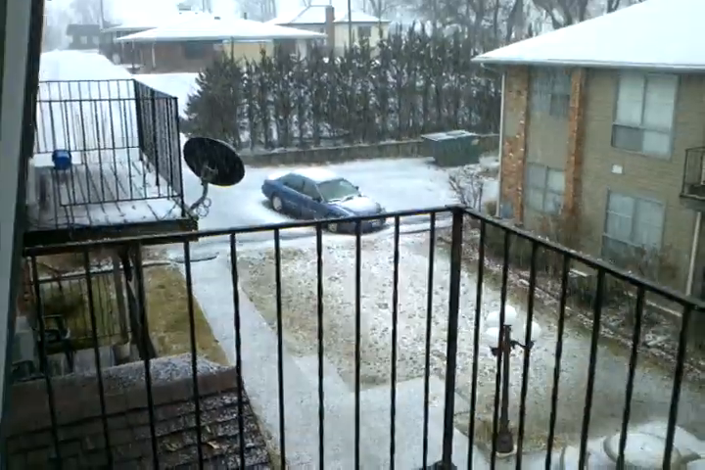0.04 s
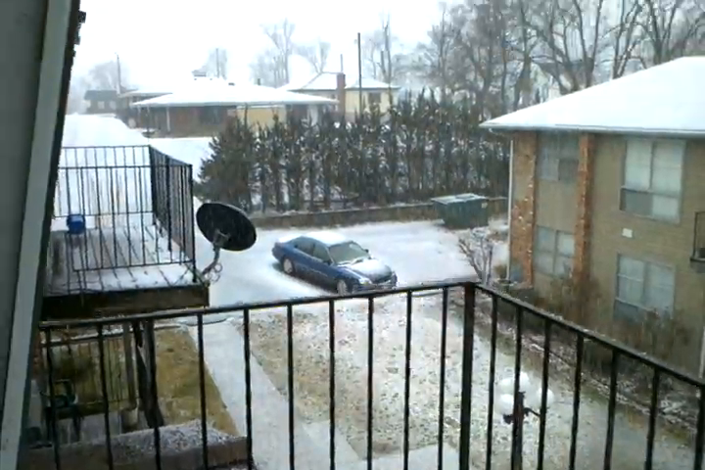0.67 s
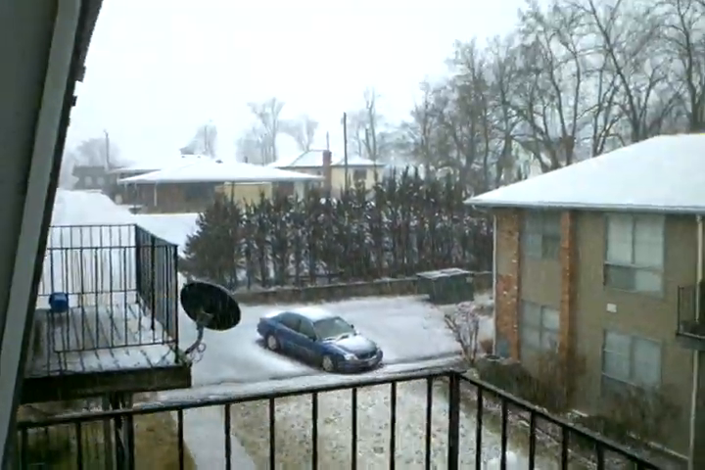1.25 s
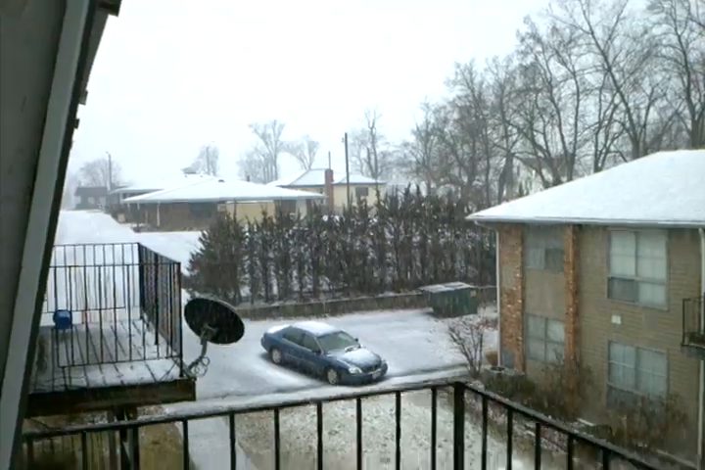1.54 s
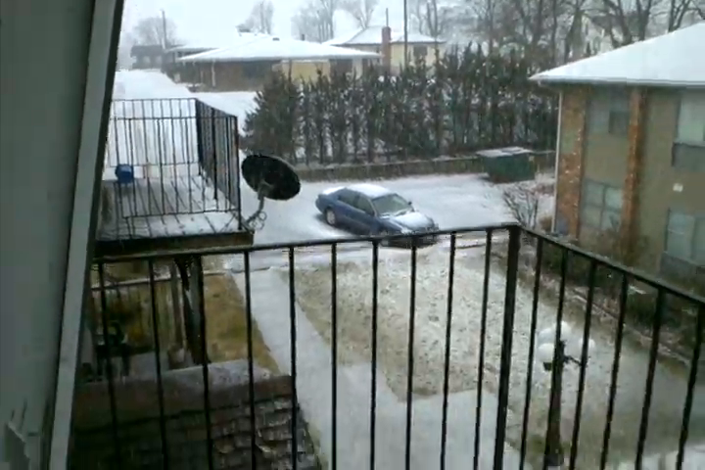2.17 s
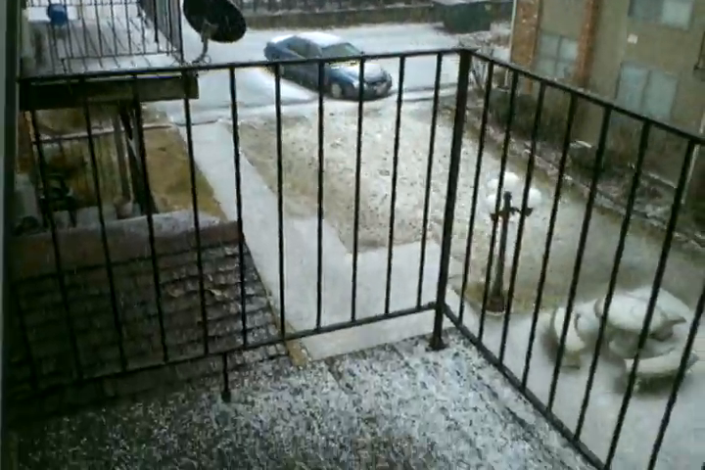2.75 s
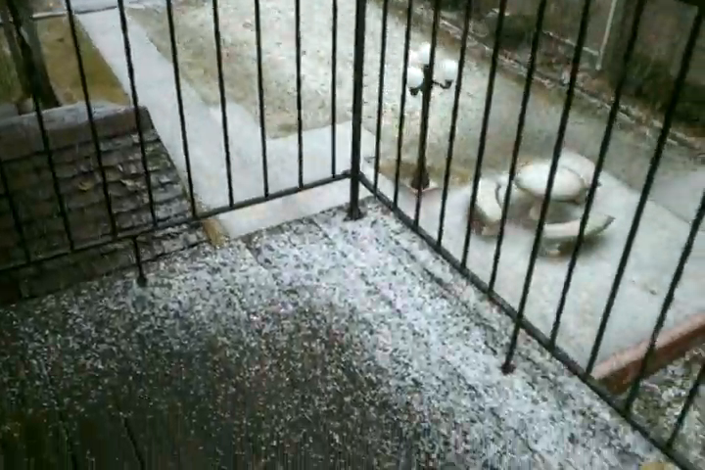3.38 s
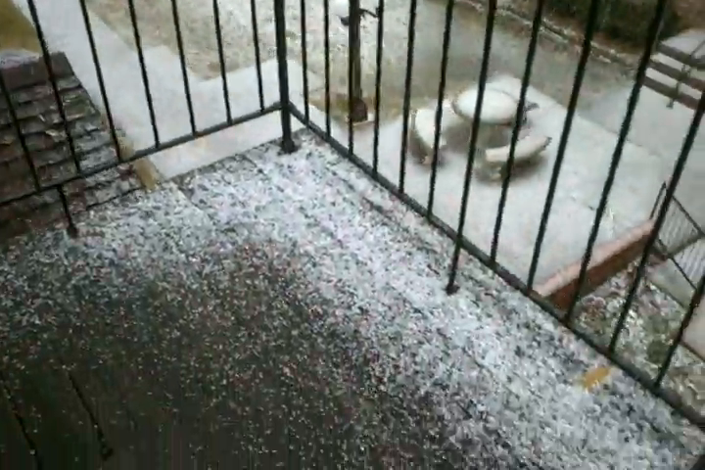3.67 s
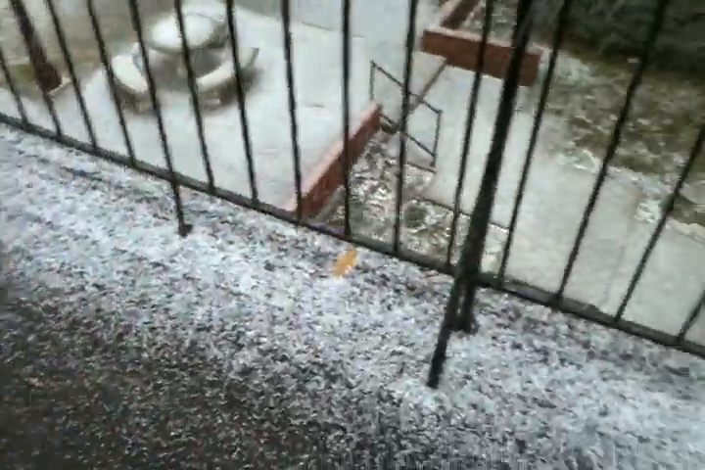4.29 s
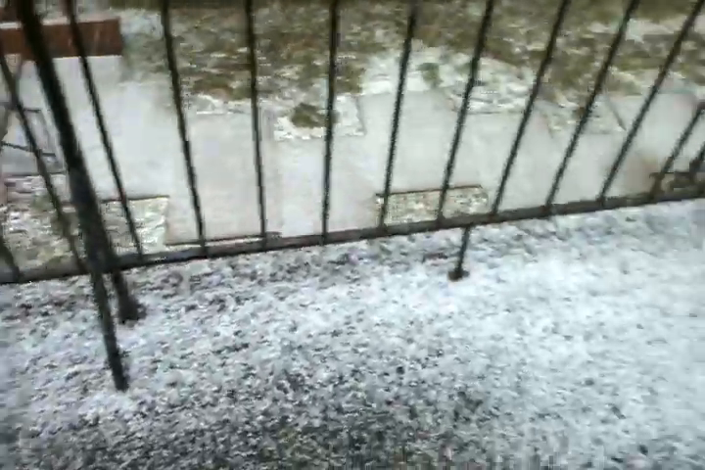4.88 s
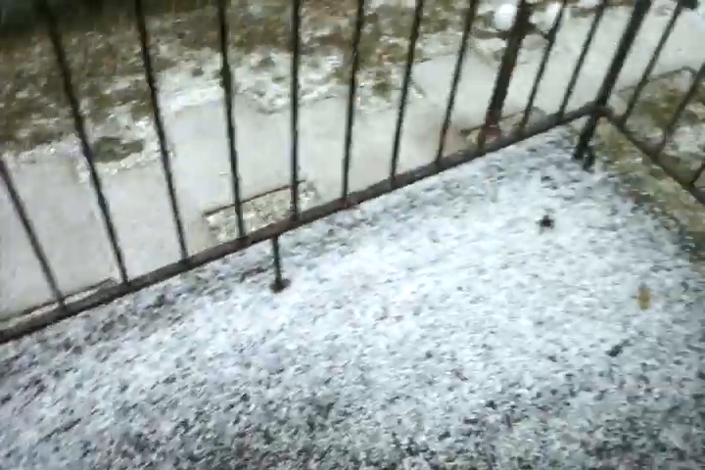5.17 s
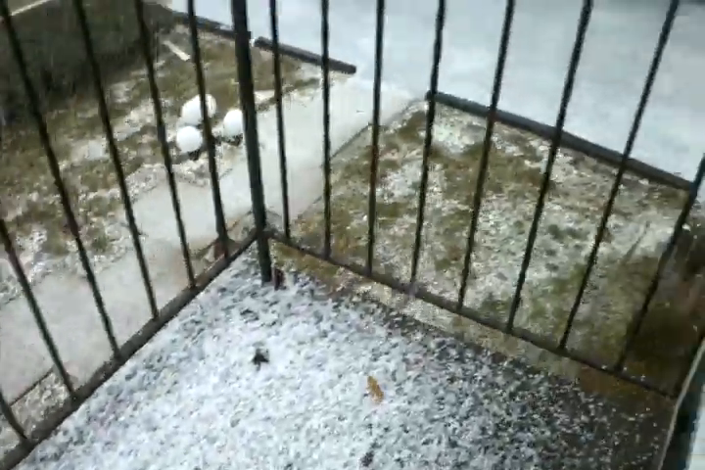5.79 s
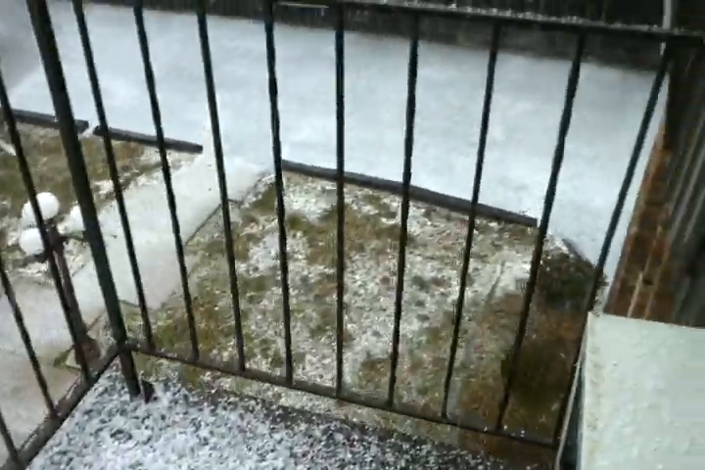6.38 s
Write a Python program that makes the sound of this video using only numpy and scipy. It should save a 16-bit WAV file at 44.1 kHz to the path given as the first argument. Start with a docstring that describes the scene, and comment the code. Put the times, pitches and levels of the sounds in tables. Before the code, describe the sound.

Sleet falls steadily on a balcony above a courtyard. Close ice pellets crack and skitter on the deck, knock on boards and ping off the iron railing, with a short echo from the walls. Behind them are a fine hiss, distant patter, soft wind rumble and a faint town murmur. The ticking grows slightly brighter and thicker midway as the small microphone tilts down, and one heavy pellet strikes close near the end.

```python
"""Sleet falls on a balcony over a courtyard, heard through one small microphone. From the start, near ice
pellets crack and skitter on the deck, knock on boards, ping on the rail and echo off the walls; behind them far
pellets patter and hiss over gusting air and the low rumble of distant road traffic. From 2.2 s the microphone
tilts down and the deck gets louder and brighter; near 4 s the hits thicken. After 5.3 s it tilts partly back,
and just before 6 s one heavy pellet rings right beside it."""
import sys
import numpy as np
from scipy import signal
from scipy.fft import rfft, irfft, next_fast_len
from scipy.io import wavfile
from scipy.ndimage import uniform_filter1d, map_coordinates

SR = 44100
rng = np.random.default_rng(int(sys.argv[2]) if len(sys.argv) > 2 else 0)


def persist_wave(psi):
    """Save psi, clipped to +-1, as 16-bit WAV."""
    counts = np.round(np.clip(psi, -1, 1) * 32767).astype(np.int16)
    wavfile.write(sys.argv[1], SR, np.atleast_2d(counts).T)


N = 292824


# Foreground hits: t/s, crack level/dB, skitter level/dB, centre f/Hz
NEAR_HITS = [(0.056, -12.5, -20.5, 9200.0), (0.156, -8, -18.4, 9300), (0.197, -12, -25, 9000.0),
             (0.207, -15, -30, 9200), (0.286, -13.5, -23, 8000.0), (0.39, -15, -18.5, 8700.0),
             (0.446, -11.5, -30, 10300.0), (0.516, -14, -21, 9300.0), (0.921, -14, -23, 8000.0),
             (0.979, -10.5, -26, 9400.0), (1.411, -20, -23, 8500.0), (1.619, -17, -22, 9200.0),
             (1.664, -17, -26, 8400.0), (1.732, -18, -21, 8500.0), (1.889, -18, -19, 8300.0),
             (2.164, -13, -22.9, 8500.0), (2.212, -12, -24, 8600.0), (2.276, -14, -23, 7800.0),
             (2.55, -12, -38, 10300.0), (2.926, -8.5, -20, 9000.0), (3.04, -17, -17.6, 8600.0),
             (3.11, -15, -20, 8900.0), (3.124, -12, -22, 8300.0), (3.195, -15, -24, 9400.0),
             (3.272, -10.5, -31.5, 7500.0), (3.414, -8, -31.5, 8800.0), (3.477, -13, -21, 10100),
             (3.697, -16.1, -26.3, 9200.0), (3.87, -13, -18, 8600.0), (3.904, -12, -24.2, 9700.0),
             (3.93, -16, -28, 11000), (3.942, -11, -17, 9500), (4.056, -7, -27, 9400.0),
             (4.062, -8.4, -23, 9100.0), (4.077, -18, -38, 9100), (4.127, -10, -22.8, 9500.0),
             (4.26, -17, -27, 10000), (4.303, -19, -17, 9000.0), (4.369, -12.5, -31.5, 9000.0),
             (4.453, -6, -36, 8600.0), (4.496, -19, -38, 8600), (4.506, -12.3, -31.5, 9800.0),
             (4.537, -18, -21, 8400.0), (4.553, -12, -24, 8600.0), (4.74, -16.5, -17, 9300.0),
             (4.869, -13, -31.5, 9500.0), (4.903, -12, -34, 11000), (4.925, -14, -20, 10200.0),
             (4.96, -11, -23, 9200.0), (5.007, -8, -20.2, 9700.0), (5.016, -15, -32, 10100),
             (5.055, -16, -29, 9500), (5.172, -13, -21, 8300.0), (5.263, -14, -25, 9000.0),
             (5.447, -19, -18, 8900.0), (5.621, -13.4, -21.3, 10300.0), (5.635, -12.4, -18, 8800.0),
             (5.743, -5, -23, 9800), (5.792, -18, -19.5, 8300.0), (5.854, -18, -32, 8700),
             (5.898, -17, -21, 10600.0), (5.914, -13, -27, 8600), (5.923, -11.9, -18, 9200.0),
             (5.969, -4, -16.5, 9100.0), (6.326, -18, -19.4, 8500.0), (6.368, -7, -17, 9200),
             (6.379, -16, -15.4, 8500.0), (6.476, -14.3, -17.1, 8200.0), (6.532, -13, -21, 8500.0)]

def near_pellets():
    """Big pellets land next to the microphone: some shatter, some bounce off whole."""
    out, facing = np.zeros(N), mic_tilt()
    for s, crack_db, skitter_db, hz in NEAR_HITS:
        add(out, s, pellet(crack_db, skitter_db, hz, facing[int(s * SR)], crack_life=0.0011))
    return out


# Tone of the pellet ticks as the microphone colours them, with its resonance near 9.2 kHz:
# f/Hz, level/dB
TICK_EQ = [(300, -39), (1500, -13), (3200, -10), (5500, -8), (7500, -3), (9200, 4.5), (10600, -5),
           (12500, -8), (15800, -15)]
# Treble lift with the microphone facing the deck: f/Hz, level/dB
TILT_EQ = [(9500, -0.5), (13000, 3)]

def pellet(crack_db, skitter_db, hz, facing, crack_life, width_hz=6000, uneven_db=4.0):
    """A first touch, a hard crack at the pellet's own pitch, then a spray of bounces and fragments."""
    t = np.arange(SR // 16) / SR
    # With its skitter 18 dB under the crack, a pellet bounces off whole and cracks shorter.
    whole = np.clip((crack_db - skitter_db) / 18, 0, 1) ** 2
    life = crack_life * (1 - 0.52 * whole)
    contact_db = 4.5 - 0.5 * whole  # over the crack
    spot_eq = np.column_stack([np.linspace(1000, 16000, 14), uneven_db * rng.standard_normal(14)])
    tone = lambda f: amp(along(TICK_EQ, f) + along(spot_eq, f) + facing * along(TILT_EQ, f))
    contact = burst(t, life=0.00012, gain=lambda f: tone(f) * resonance(f, hz, width_hz) ** .6)
    crack = burst(t, life, lambda f: tone(f) * resonance(f, hz, width_hz), rise=0.0009)
    spray_tone = lambda f: tone(f) * resonance(f, hz, 2 * width_hz) ** .5
    skitter = burst(t, life=0.011, gain=spray_tone, grit=0.55, rise=0.0027)
    return amp(crack_db) * (amp(contact_db) * contact + crack) + amp(skitter_db) * skitter


# Modes of the heavy pellet: f/Hz, level/dB, t60/s
HEAVY_MODES = [(1800, -28, 0.032), (6170, -5.5, .013), (7100, -0.5, 0.0083), (9250, -10, 0.015),
               (14650, -3, 0.0089)]

def heavy_pellet(at_s=5.968, rise_s=0.00034):
    """One heavy pellet beside the microphone rings in a few modes, gone within milliseconds."""
    out, t = np.zeros(N), np.arange(SR // 32) / SR
    ring = sum(amp(db - 60 * t / t60) * np.sin(2 * np.pi * hz * t) for hz, db, t60 in HEAVY_MODES)
    add(out, at_s, ring * (1 - np.exp(-t / rise_s)))
    return out


def deck_pellets(count=190, range_db=9, low_hz=7000, high_hz=13500):
    """Smaller pellets land all over the deck, many faint and few strong."""
    out, facing, faintest_db = np.zeros(N), mic_tilt(), deck_level() - 2
    for when, size, pitch in rng.random((count, 3)):
        at = int(when * N)
        db = faintest_db[at] + range_db * size ** 2
        hz = low_hz + (high_hz - low_hz) * pitch
        add(out, at / SR, pellet(db, db - 6, hz, facing[at], crack_life=0.00091))
    return out


def fine_grains(trim_db=-11, clump_db=4):
    """Grains bounce about the deck: hundreds of tiny bright ticks a second, in little flurries."""
    flurries = amp(clump_db * np.clip(wobble(rate=70), -2, 2))
    grains = impacts(rate=900, spread_db=6.5) * flurries
    bright = unit(shaped(grains, lambda f: amp(along(TICK_EQ, f)) * f))
    return amp(deck_level() + trim_db) * bright


def deck_level(level_db=-27, facing_db=2.0):
    """Fader in dB for the deck's small pellets, up while the microphone faces them."""
    return level_db + facing_db * mic_tilt()


# Microphone move: t/s, tilt (1 = facing the deck)
TILT = [(0, 0), (2.2, 0), (4.2, 1), (5.3, 1), (6.64, .35)]

def mic_tilt():
    """How far the microphone faces down at each sample."""
    return track(TILT)


# Knocks on the boards: t/s, level/dB, ring f/Hz
BOARD_HITS = [(0.155, -27.5, 1230), (0.39, -28, 1350), (0.425, -30, 2040), (1.253, -33, 1400),
              (1.434, -35, 1850), (1.768, -27.5, 1130), (1.945, -30, 1280), (2.454, -30, 1770),
              (3.04, -30, 1220), (3.123, -29, 1930), (4.542, -29, 2080), (4.925, -34, 1460),
              (5.446, -29, 1640), (5.96, -30, 1400), (6.326, -30.5, 1350), (6.475, -28.5, 1760)]

def boards():
    """Pellets hit boards and panels: a hard tap and a midrange rattle."""
    return struck(BOARD_HITS, life=.016, width_hz=780, grit=.25, tap_db=5)


# Pings on the rail: t/s, level/dB, ring f/Hz
RAIL_HITS = [(0.155, -22.5, 4000), (0.196, -26, 4430), (0.285, -24, 4800), (0.485, -27, 4500),
             (1.72, -24, 4890), (1.89, -20.5, 4660), (2.276, -20, 4480), (2.395, -24, 3810),
             (3.123, -22, 2970), (3.271, -20, 4650), (3.697, -22.5, 4220), (4.063, -24, 6160),
             (4.535, -22, 4710), (4.829, -22.5, 3400), (5.63, -22, 4070), (5.959, -21, 4700),
             (6.325, -19.5, 5170)]

def rail():
    """Pellets hit the iron rail: a light tap and a tight, bright ring."""
    return struck(RAIL_HITS, life=0.0033, width_hz=1800, grit=0.12, tap_db=-6)


def struck(rows, life, width_hz, grit, tap_db, tap_life=.0007):
    """Each blow is a broad tap that wakes a cluster of modes; grit makes it rattle."""
    out, t = np.zeros(N), np.arange(SR // 8) / SR
    for s, db, hz in rows:
        tap = burst(t, tap_life, lambda f: resonance(f, hz, hz) ** 2)
        ring = burst(t, life, lambda f: resonance(f, hz, width_hz) ** 2 * (f / (f + hz)), grit)
        add(out, s, amp(db) * (ring + amp(tap_db) * tap))
    return out


# Reverb time of the walls: f/Hz, t60/s
WALL_DECAY = [(300, .2), (2000, 0.21), (9000, 0.072), (16000, 0.097)]

def walls(x):
    """The building answers with a short echo; the treble dies first."""
    hz, t, noise = signal.stft(rng.standard_normal(SR // 4), SR, nperseg=256)
    decay = amp(-60 * t / along(WALL_DECAY, hz)[:, None])
    tail = signal.istft(noise * decay, SR, nperseg=256)[1]
    predelayed = np.pad(x, (SR // 150, 0))
    return signal.fftconvolve(predelayed, tail / np.linalg.norm(tail))[:N]


# Tone of the far patter: f/Hz, level/dB
PATTER_EQ = [(100, -15.5), (300, -11.5), (600, -4.5), (900, -3), (1400, 1.5), (1950, 1), (2900, -3.5),
             (4500, -9.5), (9000, -17.5)]
# Tone of the icy hiss: f/Hz, level/dB
HISS_EQ = [(1000, -51), (3000, -15), (4800, -6.5), (6300, -6), (8000, -2.5), (9250, -1), (10400, -5),
           (12000, -11), (15800, -15)]

def far_pellets(patter_db=-34, hiss_db=-28):
    """Thousands of far pellets patter on roofs and ground and hiss on the ice."""
    patter = bed(impacts(rate=7000, spread_db=4), PATTER_EQ)
    hiss = bed(impacts(rate=30000, spread_db=3), HISS_EQ)
    flurry = wobble(rate=22)  # the pellets arrive in clumps
    fizz_db = 0.82 * wobble(rate=90)
    return amp(patter_db + 0.9 * flurry) * patter + amp(hiss_db + 0.72 * flurry + fizz_db) * hiss


# Tone of the air rumble: f/Hz, level/dB
AIR_EQ = [(12, -10.5), (28, -2.5), (48, 3.5), (62, -5.5), (85, -2.5), (120, -18), (250, -37.5)]
# Fader ride of the gusts: t/s, level/dB
GUST_RIDE = [(0, -42), (0.25, -46), (0.55, -39.3), (0.9, -42.7), (1.4, -45), (1.8, -39.5), (2.3, -40.5),
             (2.95, -44), (3.2, -38), (3.75, -39), (4.25, -41), (4.8, -45), (5.2, -39.5), (5.7, -45),
             (6.15, -40), (6.64, -44)]

def air(trim_db=0.5, buffet_db=0.6):
    """Moving air rumbles on the microphone in slow gusts with quick buffeting."""
    rumble = bed(rng.standard_normal(N), AIR_EQ)
    return amp(track(GUST_RIDE) + trim_db + buffet_db * wobble(rate=16)) * rumble


# Tone of the town: f/Hz, level/dB
TOWN_EQ = [(60, -7), (130, -0.5), (250, -1), (360, -5), (600, -6), (1100, -13), (2500, -26)]
# Fader ride of the town: t/s, level/dB
TOWN_RIDE = [(0, -38.5), (.7, -41.5), (3, -41.5), (6.64, -44.5)]

def town():
    """The far town's road traffic is a low rumble that eases off."""
    return amp(track(TOWN_RIDE)) * bed(rng.standard_normal(N), TOWN_EQ)


def burst(t, life, gain, grit=0., rise=0.):
    """Coloured noise with attack (rise) and 1/e decay (life) in s; grit clumps it into tiny contacts."""
    noise, clumps = rng.standard_normal((2, len(t)))
    clumps = unit(uniform_filter1d(clumps, size=30))
    swell = 1 - np.exp(-t / (rise + 1 / SR))
    x = coloured(noise * swell * np.exp(grit * clumps - t / life), gain)
    return x * np.sqrt(life * SR / 2 / np.sum(x ** 2))


def impacts(rate, spread_db):
    """Impulses at random moments, rate a second, of log-normal size and either sign."""
    when, radius, angle = rng.random((int(rate * N / SR), 3)).T
    size = np.sqrt(-2 * np.log(1 - radius)) * np.cos(2 * np.pi * angle)  # Gaussian
    sign = (-1) ** np.arange(len(when))
    return np.bincount((when * N).astype(int), sign * amp(spread_db * np.minimum(size, 2.3)), N)


def bed(x, eq):
    """A background layer: x through an EQ curve, at rms 1."""
    return unit(shaped(x, lambda f: amp(along(eq, f))))


def coloured(x, gain, size=1024):
    """Minimum-phase EQ, so a hit has no pre-ring."""
    cepstrum = irfft(np.log(np.maximum(gain(np.fft.rfftfreq(size, 1 / SR)), 1e-6)))
    cepstrum[1:size // 2] *= 2
    cepstrum[size // 2 + 1:] = 0
    return signal.fftconvolve(x, irfft(np.exp(rfft(cepstrum))))[:len(x)]


def shaped(x, gain):
    """Zero-phase EQ for a full-length layer."""
    m = next_fast_len(N + SR // 2)
    return irfft(rfft(x, m) * gain(np.fft.rfftfreq(m, 1 / SR)), m)[:N]


def resonance(f, hz, width_hz):
    """Gain of one resonance, 1 at its peak."""
    return np.abs(f * width_hz / (hz * hz - f * f + 1j * f * width_hz))


def wobble(rate):
    """A smooth random curve, rate knots a second."""
    return map_coordinates(rng.standard_normal(int(N * rate / SR) + 4), [np.arange(N) * rate / SR])


def track(rows):
    """Automation from (t/s, value) points, one value per sample."""
    return np.interp(np.arange(N) / SR, *np.transpose(rows))


def along(points, hz):
    """(f/Hz, value) points read on a log axis."""
    f, v = np.transpose(points)
    return np.interp(np.log(hz + 1), np.log(f + 1), v)


def add(out, s, sound):
    """Mix a sound in at time s."""
    start = max(round(s * SR), 0)
    part = out[start:start + len(sound)]
    part += sound[:len(part)]


def amp(db):
    """Decibels to gain."""
    return 10 ** (np.asarray(db) / 20)


def unit(x):
    """Scale to rms 1."""
    return x / np.sqrt(np.mean(x ** 2) + 1e-20)


def scene(echo_db=-9.5):
    """Close hits and their echo over the background beds, the same in both channels."""
    close = boards() + rail() + near_pellets() + heavy_pellet() + deck_pellets() + fine_grains()
    mono = close + amp(echo_db) * walls(close) + far_pellets() + air() + town()
    return np.array([mono, mono])


def record(dry, top_hz=15850):
    """The microphone chain clips at full scale and keeps nothing above its band limit."""
    return np.array([shaped(x, lambda f: f < top_hz) for x in np.clip(dry, -1, 1)])


dry = scene()
out = record(dry)
persist_wave(out)
```